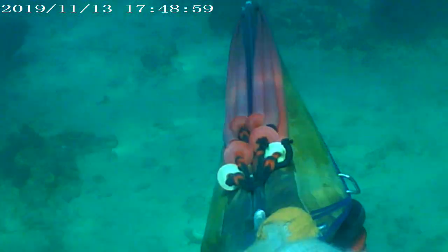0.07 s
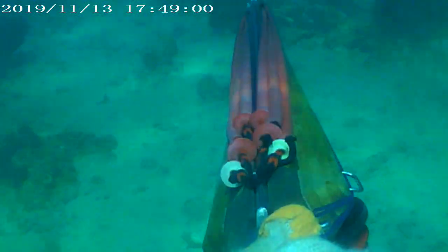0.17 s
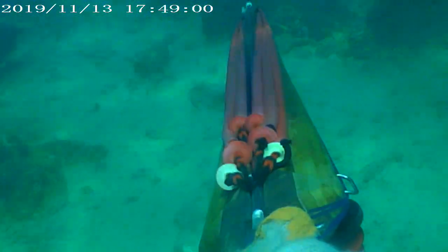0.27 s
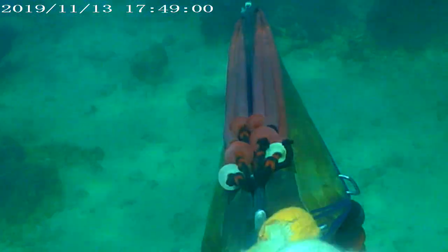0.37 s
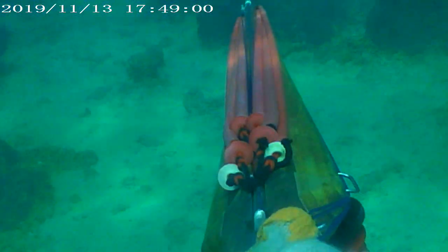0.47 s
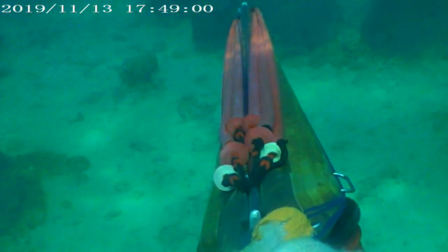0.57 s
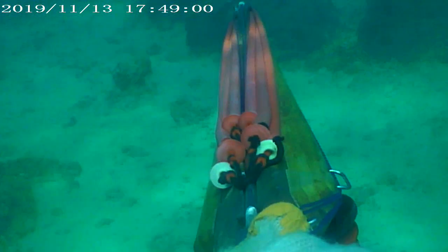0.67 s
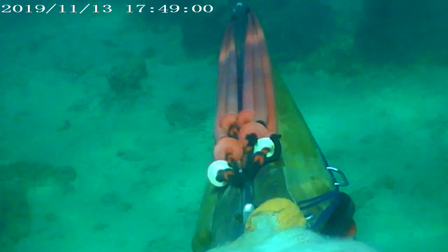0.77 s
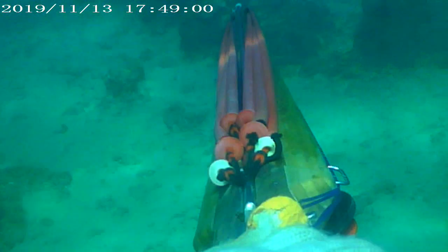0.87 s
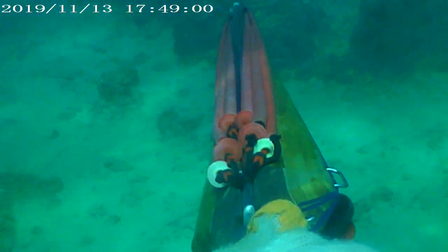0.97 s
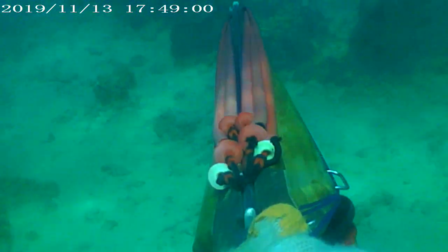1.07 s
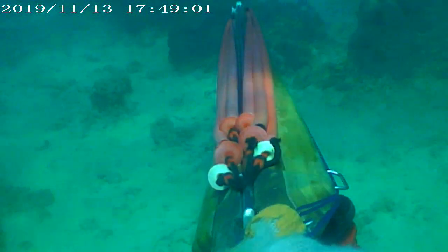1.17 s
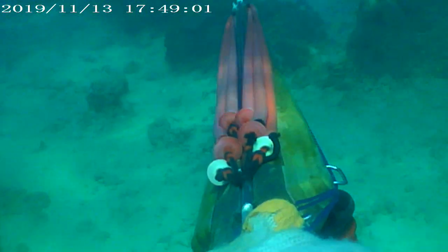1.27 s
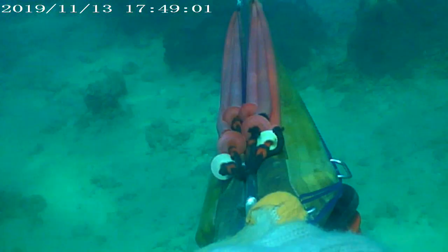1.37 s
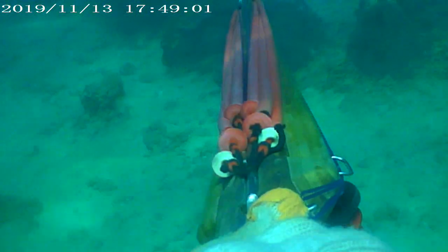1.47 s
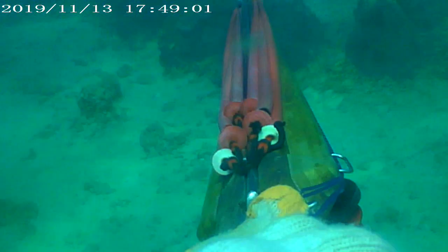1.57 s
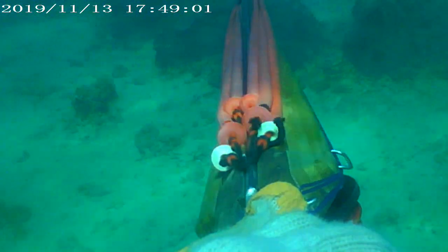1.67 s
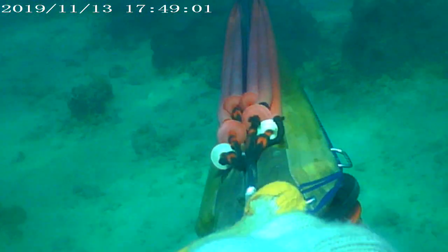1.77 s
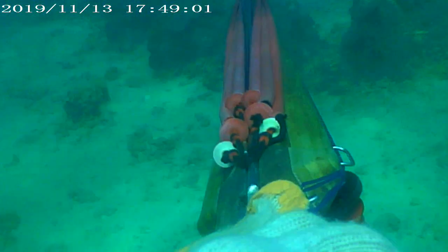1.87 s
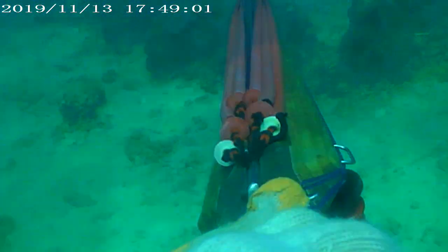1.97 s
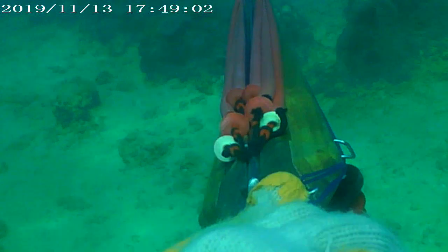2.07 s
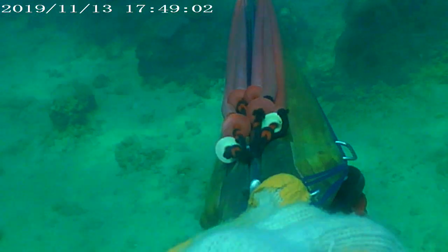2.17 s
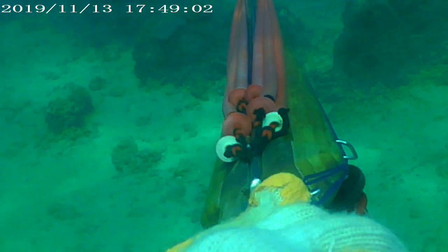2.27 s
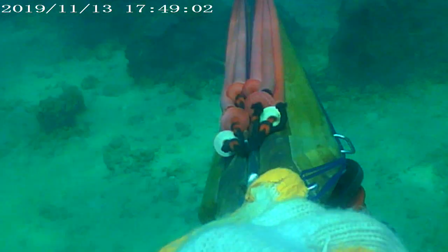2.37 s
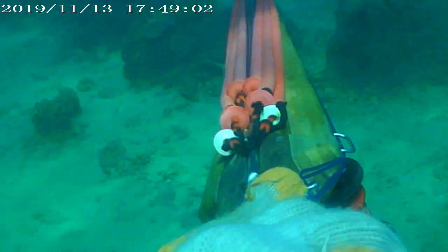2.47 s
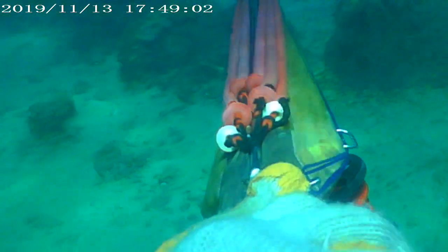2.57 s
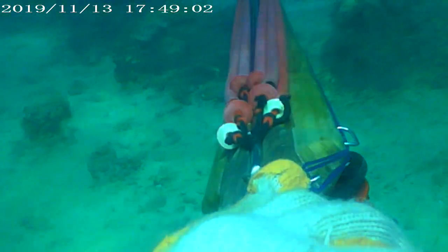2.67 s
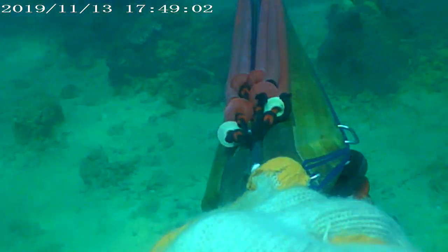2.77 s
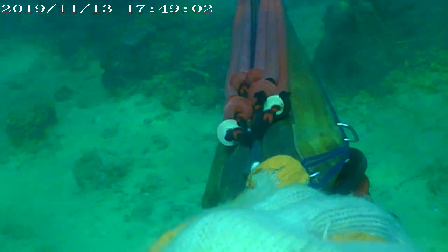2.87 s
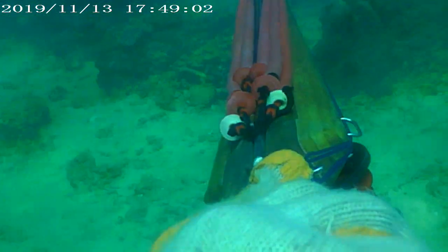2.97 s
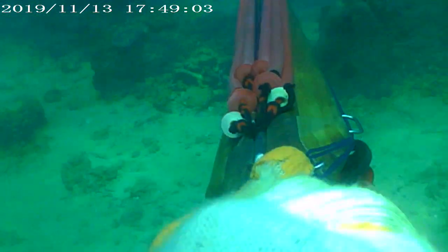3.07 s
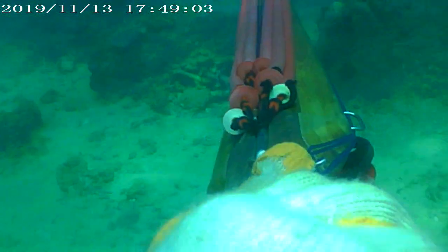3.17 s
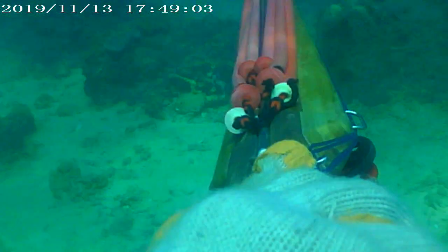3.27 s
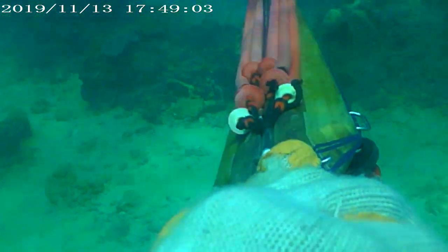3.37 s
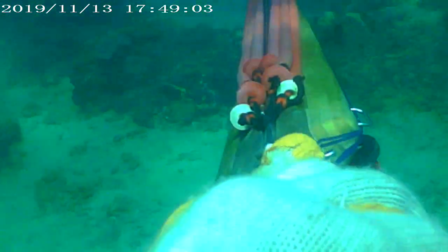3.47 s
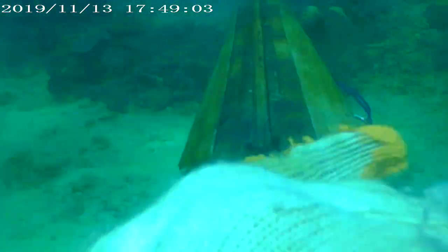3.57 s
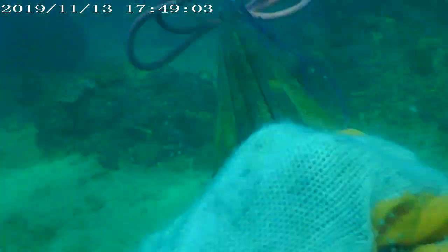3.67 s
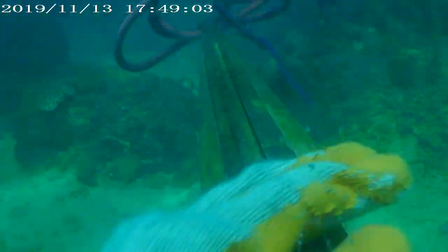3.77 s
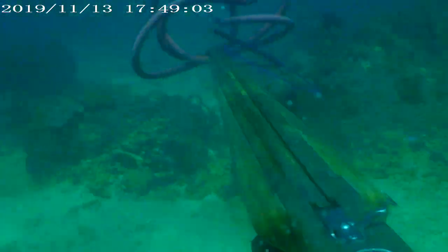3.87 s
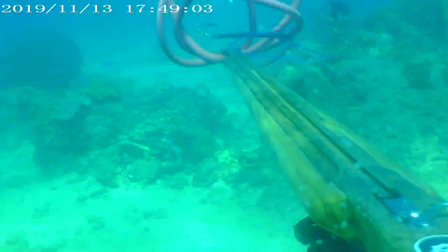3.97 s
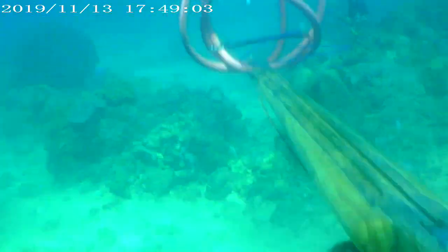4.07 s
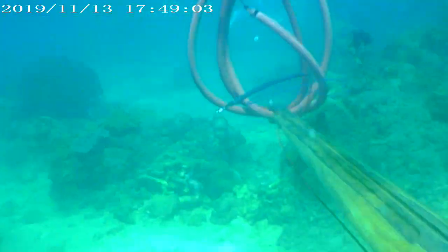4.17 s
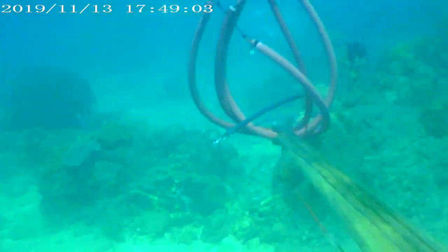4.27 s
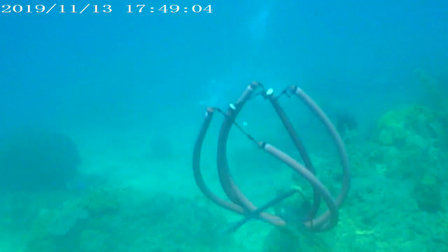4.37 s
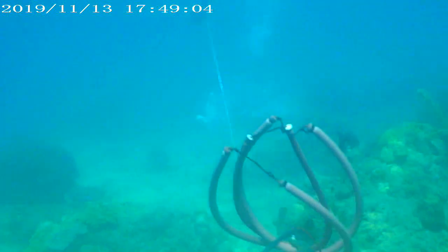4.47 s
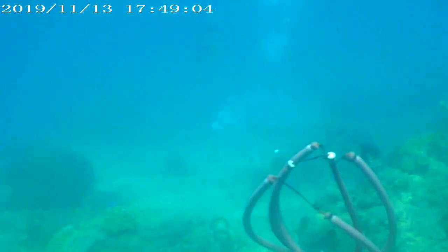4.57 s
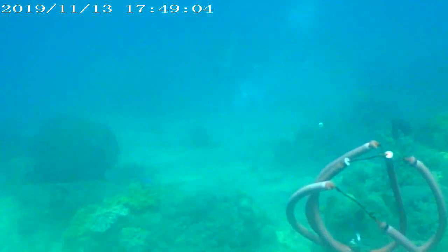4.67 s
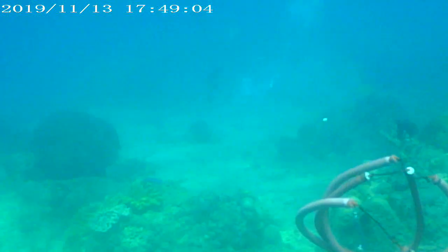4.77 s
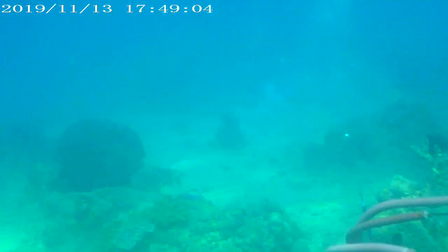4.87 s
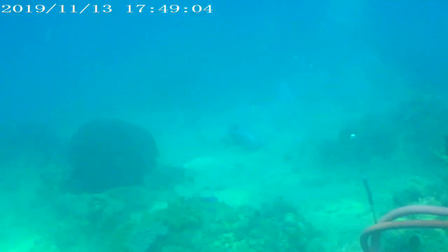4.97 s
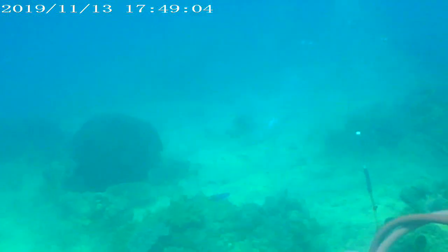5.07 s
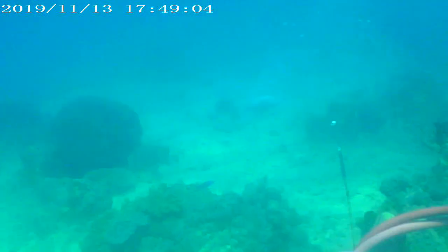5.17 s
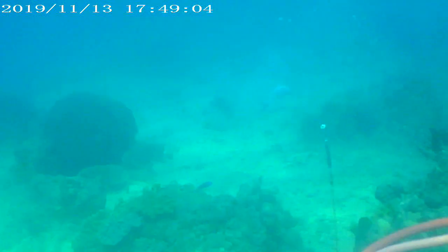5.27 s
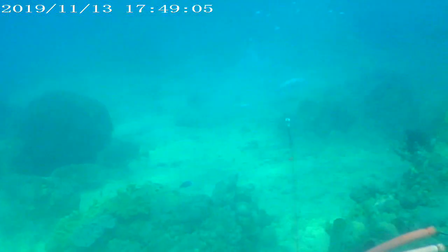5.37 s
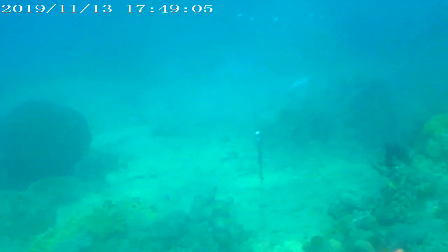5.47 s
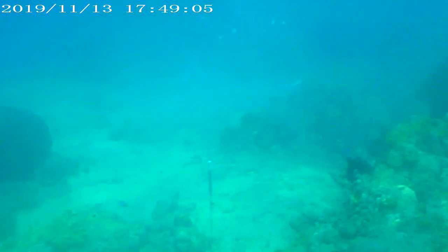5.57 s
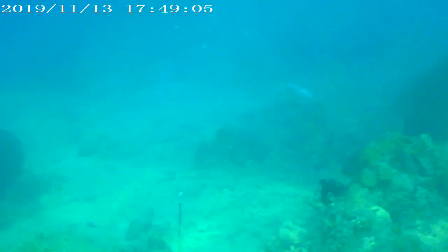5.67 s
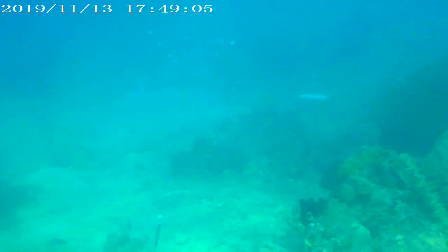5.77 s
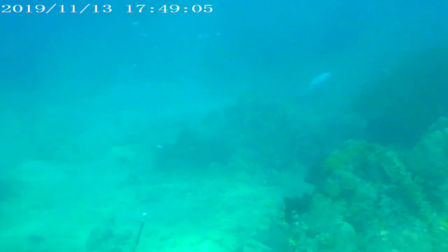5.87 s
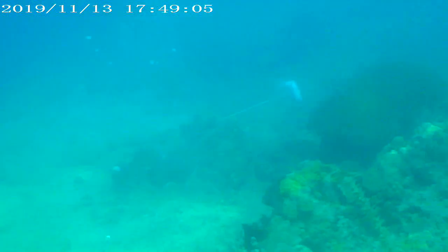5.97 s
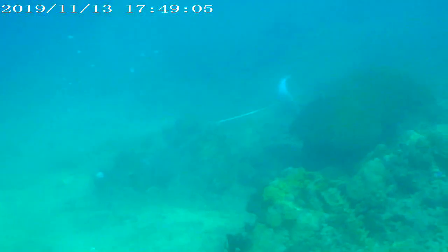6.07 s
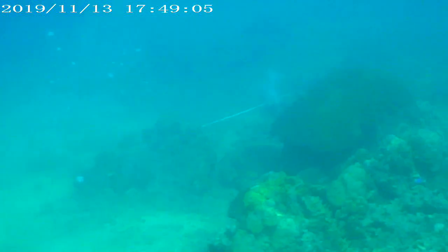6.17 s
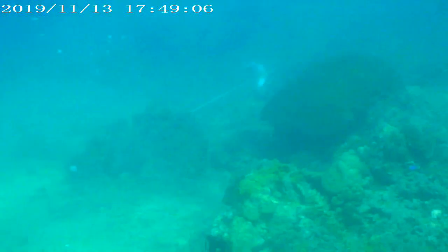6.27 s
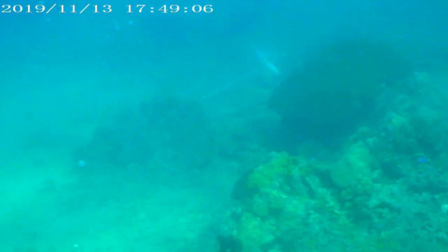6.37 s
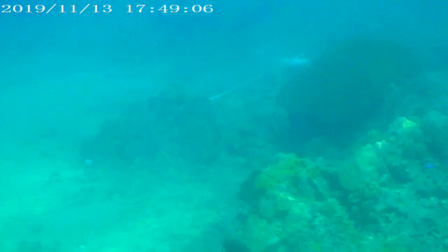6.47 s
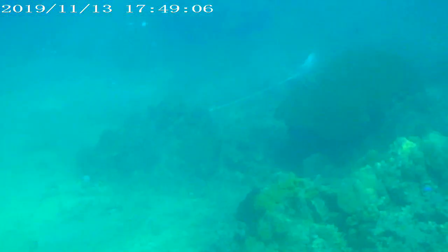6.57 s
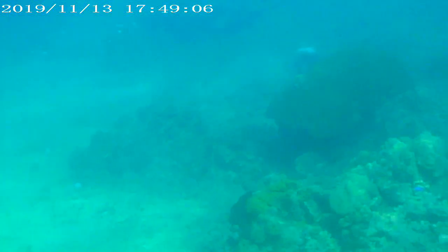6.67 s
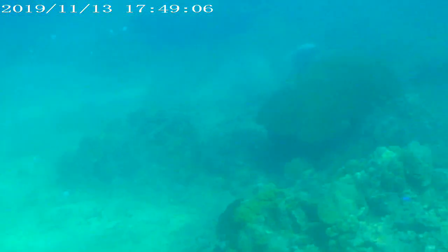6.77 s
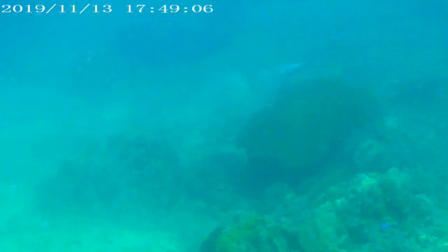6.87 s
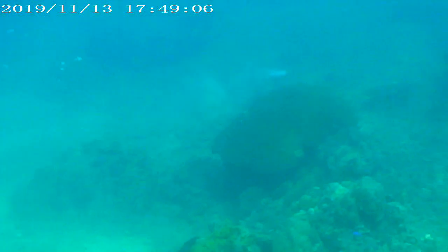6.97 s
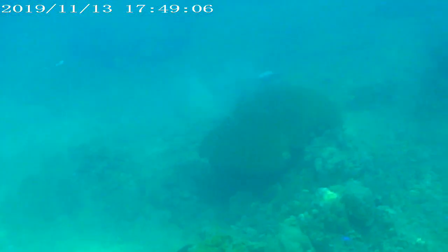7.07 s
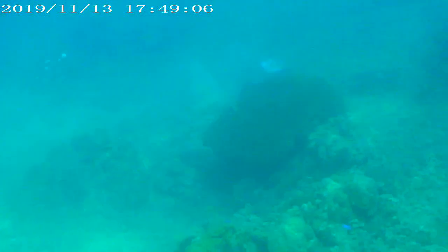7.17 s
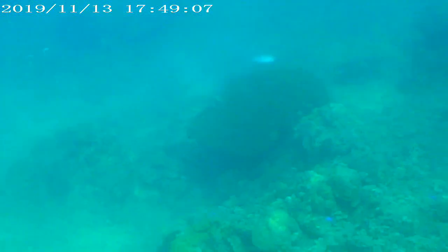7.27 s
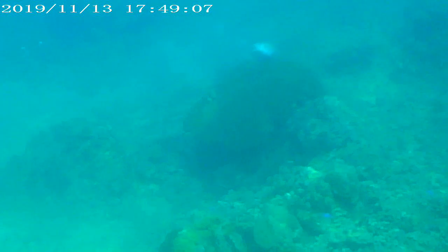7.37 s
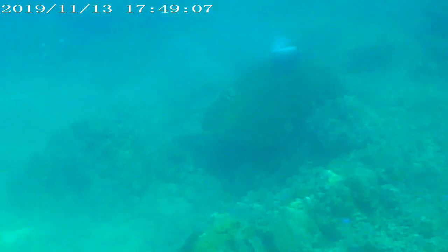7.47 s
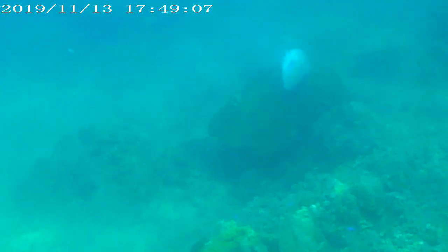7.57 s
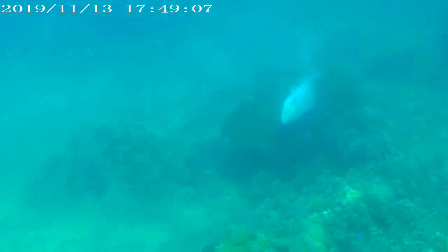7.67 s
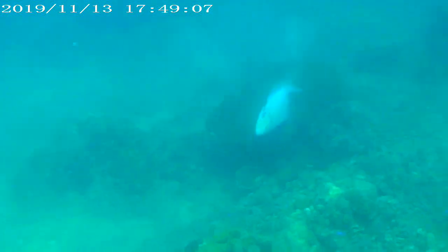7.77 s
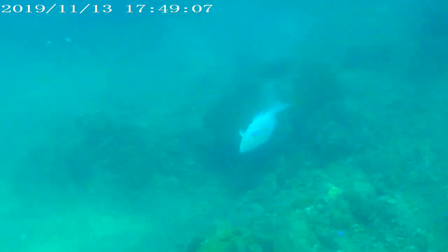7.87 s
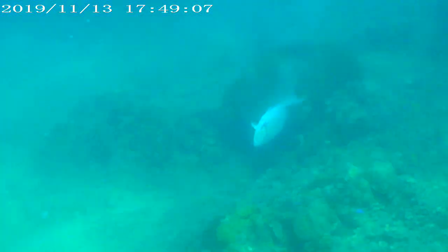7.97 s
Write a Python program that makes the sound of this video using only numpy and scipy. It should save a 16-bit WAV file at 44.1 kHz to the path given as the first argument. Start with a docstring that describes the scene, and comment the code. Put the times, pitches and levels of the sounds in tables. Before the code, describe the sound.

Near-silent underwater hiss with a sharp early knock, then a violent distorted speargun shot and line jerk, followed by rubbing, clicks and bubbly squeaks.

```python
"""Under water, a camera in a plastic housing rides with a rubber-powered speargun, its one microphone inside.
Behind all lies a faint hiss; water, glove and line rub on the housing, and trapped air squeaks out as bubbles.
Knocks and ticks ring the shell and window as decaying modes. Loudest are the shot and the jerk of the line:
swinging tones and rattle that overload the converter, whose values wrap round to the other sign."""
import sys
import numpy as np
from scipy.fft import rfft, irfft, next_fast_len
from scipy.io import wavfile
from scipy.ndimage import map_coordinates

SR = 44100
rng = np.random.default_rng(int(sys.argv[2]) if len(sys.argv) > 2 else 0)


def to_wav(s):
    """Save 16-bit WAV."""
    ch = np.atleast_2d(s).T  # columns
    pcm = np.round(np.clip(ch, -1, 1) * 32767)  # PCM
    wavfile.write(sys.argv[1], SR, pcm.astype(np.int16))


N = 353902  # samples


def amp(db):
    """Gain of a level in dB."""
    return 10 ** (np.asarray(db) / 20)


def unit(x):
    """x at rms 1."""
    return x / np.sqrt(np.mean(x ** 2) + 1e-20)


def curves(rows):
    """One value per sample for each column after the time; -120 outside the table."""
    times, *columns = np.transpose(rows)
    t = np.arange(N) / SR
    return [np.interp(t, times, column, left=-120, right=-120) for column in columns]


def wobble(rate):
    """A smooth random curve, rate knots a second."""
    knots = rng.standard_normal(int(N * rate / SR) + 4)
    return map_coordinates(knots, [np.arange(N) * rate / SR])


def filtered(x, response):
    """x times a complex response of frequency, padded so that tails do not wrap."""
    m = next_fast_len(len(x) + 8192)
    return irfft(rfft(x, m) * response(np.fft.rfftfreq(m, 1 / SR)), m)[:len(x)]


def modes(table, wider=0.86):
    """Causal response of a set of resonances, alternating in sign, every width scaled by wider."""
    def response(f):
        total = 0
        for k, (center, width, db) in enumerate(table):
            damping = 1j * f * width * wider
            total = total + (-1) ** k * amp(db) * damping / (center ** 2 - f ** 2 + damping)
        return total
    return response


def grains(rate, spread_db, bed):
    """Random slips of uneven size, rate a second on average, on a bed of noise."""
    chance, size = rng.random((2, N))
    sizes = amp(-spread_db * np.log(size + .04))
    slips = (chance < rate / SR) * sizes * rng.choice([-1, 1], N)
    return unit(slips) + bed * rng.standard_normal(N)


def ring(table, t60, attack):
    """One blow: every mode at a new strength, swelling for the attack time, peak 1."""
    t = np.arange(SR // 5) / SR
    x = np.zeros(len(t))
    for hz, width, db in table:
        strength = amp(db + rng.normal(0, 2))
        x += strength * np.sin(2 * np.pi * hz * t) * np.exp(-.5 * width * t)
    x = x * amp(-60 * t / t60) * (1 - np.exp(-(t / attack) ** 2))
    return x / np.abs(x).max()


def add(track, s, x):
    """Mix x into track at time s."""
    track[round(s * SR):][:len(x)] += x


# spectrum of the faint background: f/Hz, relative density level/dB per Hz
HISS_SPECTRUM = [(15, -52), (25, -12.5), (64, -6.5), (98, -2), (150, -4), (258, -4.5), (728, -5), (944, -8),
                 (4270, -14.5), (7000, -17), (9100, -43.5), (15400, -120)]
HISS_DB = -58  # rms level, before a slight wobble


def hiss():
    """Microphone noise and far reef crackle: sparse grains on noise, shaped to one spectrum."""
    f, density_db = np.transpose(HISS_SPECTRUM)
    spectrum = lambda hz: amp(np.interp(np.log(hz + 1), np.log(f), density_db))
    x = filtered(grains(210, 2.4, bed=1.77), spectrum)
    return amp(HISS_DB + .6 * wobble(19)) * unit(x)


# Resonances of the housing's shell and of its stiff window: f/Hz, width, level/dB.
# Width is in Hz, before scaling, where noise is filtered; in a blow, half of it is a decay rate per second.
SHELL_MODES = [(183, 26, 1), (329.5, 13, -13.5), (502.7, 123, -1), (594.4, 98, -1.5), (830, 88, -20.5)]
WINDOW_MODES = [(1406, 160, -3.5), (1899.5, 120, -4), (2076, 120, -4), (3007, 110, -3.5), (4230, 310, -9),
                (5230, 200, -16), (5927, 310, -9.5)]
# water streaming along the housing after the shot, levels before the trims in rubbing():
# t/s, rumble level/dB, shell level/dB, window level/dB
WATER_STREAM = [(3.76, -39, -38, -48), (3.88, -53.5, -41, -48.5), (4.15, -59.5, -46, -52),
                (4.57, -63.5, -49.5, -56.5), (4.78, -63.5, -52.5, -55.5), (5.1, -68, -59, -57.5),
                (5.4, -66, -56, -54), (5.53, -51.5, -43.5, -55), (5.76, -63, -56.5, -57.5),
                (6.02, -74, -63, -62), (6.31, -62, -57.5, -58.5), (6.43, -58.5, -64, -64),
                (6.56, -51.5, -47.5, -61), (6.76, -70.5, -69, -68), (6.92, -63.5, -54, -56.5),
                (7.2, -65.5, -58.5, -63), (7.5, -64, -54.5, -61.5), (7.76, -62.5, -49, -55.5),
                (7.9, -61, -55.5, -65), (8.02, -62, -72, -62)]
STREAM_FIZZ_DB = -10  # upper window over the lower, before the trims
# line and glove scraping over the window, levels before the trims:
# start t/s, length t/s, level/dB, upper window level/dB over it
WINDOW_SCRAPES = [(0.395, .045, -54, 5), (3.745, .04, -36, -12), (4.628, 0.15, -40, -6),
                  (4.919, 0.12, -45, -2), (5.148, 0.043, -39, -7.5), (5.332, 0.082, -49, 4),
                  (5.432, 0.032, -52, 17.5), (5.513, 0.071, -40.5, -6), (5.639, 0.12, -48.5, -7.5),
                  (6.458, 0.048, -38.5, -1.5), (6.535, 0.1, -53, 0.5), (6.655, .04, -48, -7),
                  (7.08, 0.11, -58, -1), (7.324, 0.099, -52, -3), (7.497, 0.082, -51.5, 2.5),
                  (7.615, 0.24, -53.5, -1)]


def rubbing():
    """Slips of glove, line and water excite each part of the housing; each scrape swells and fades."""
    rumble_db, shell_db, window_db = curves(WATER_STREAM)
    window_gain = amp(window_db)
    fizz_gain = amp(window_db + STREAM_FIZZ_DB)
    for s, length, db, upper_db in WINDOW_SCRAPES:
        swell = np.sin(np.pi * np.linspace(0, 1, round(length * SR)) ** 0.87)
        add(window_gain, s, amp(db) * swell)
        add(fizz_gain, s, amp(db + upper_db) * swell)
    rumble_modes = [(40, 50, -4), (125, 50, 0), SHELL_MODES[0], (290, 90, -5)]
    rumble = unit(filtered(grains(48, 3.1, bed=0.72), modes(rumble_modes)))
    shell = unit(filtered(grains(110, 2.5, bed=0.55), modes(SHELL_MODES[1:])))
    scrape = grains(260, 4.5, bed=.55) * amp(3 * wobble(35))
    window = unit(filtered(scrape, modes(WINDOW_MODES[:3])))
    fizz = unit(filtered(scrape, modes(WINDOW_MODES[3:])))
    body = amp(rumble_db + 4 + 2.0 * wobble(8)) * rumble + amp(shell_db - 1 + 5.2 * wobble(24)) * shell
    return body + amp(-4.0) * window_gain * window + amp(-7.5) * fizz_gain * fizz


# trapped air squeaking out: t/s, length t/s, first f/Hz, last f/Hz, peak level/dB before the wavering
AIR_BUBBLES = [(4.253, 0.055, 522, 565, -36.5), (5.16, 0.024, 1950, 2200, -33.5),
               (5.318, .045, 1985, 1940, -46), (5.379, 0.027, 710, 680, -44),
               (6.543, 0.026, 1890, 1900, -43.5), (7.085, .03, 1880, 1950, -51.5)]


def bubbles():
    """Each one is a wavering tone that glides, swells and fades."""
    out = np.zeros(N)
    for s, length, first_hz, last_hz, db in AIR_BUBBLES:
        u = np.arange(round(length * SR)) / (length * SR)
        swell = np.sin(np.pi * u ** 1.06)
        glide_hz = first_hz + (last_hz - first_hz) * u
        add(out, s, amp(db) * swell * np.sin(2 * np.pi * np.cumsum(glide_hz) / SR))
    return out * amp(3.95 * wobble(200))


# hard contacts: t/s, strength as level/dB before the ring and crack trims, emphasised f/Hz
HARD_TICKS = [(0.2956, -31, 4200), (0.3338, 2.2, 3688), (0.41, -40, 3920), (0.434, -39.5, 1370),
              (0.897, -38, 2020), (1.1045, -38, 1880), (1.2497, -39, 2000), (2.23, -36, 1920),
              (2.6995, -42, 2070), (3.1421, -27, 1790), (3.3656, -36.5, 2020), (3.8423, -39, 1970),
              (4.1694, -43, 2050), (4.4466, -33.5, 4220), (4.643, -28, 1800), (4.675, -27.5, 1480),
              (4.7152, -23.5, 1446), (4.7917, -38.5, 1870), (4.83, -40, 1390), (4.9626, -29.5, 2060),
              (5.018, -40, 1370), (5.2784, -37.5, 1480), (5.356, -31.5, 1920), (5.443, -24.5, 3070),
              (5.5131, -23, 2000), (5.5697, -34.5, 1800), (5.658, -32.5, 1520), (5.716, -43, 2000),
              (5.804, -32.5, 1300), (6.1254, -31, 1890), (6.215, -40, 2000), (6.4647, -16.5, 1460),
              (6.4842, -26, 1690), (6.5994, -35.5, 1980), (6.6838, -41, 1990), (6.986, -42, 4230),
              (7.0444, -32, 2120), (7.1435, -30, 1920), (7.5374, -36, 1390), (7.585, -34.5, 2000),
              (7.7528, -38, 1410), (7.79, -44, 1400), (7.9108, -32.5, 4230), (7.998, -38, 4200)]
TICK_ATTACK_S = .001
TICK_T60_S, TICK_DAMPING = 0.023, 0.086  # t60 at strength 0 dB; it grows this many dB per dB of weakness


def ticks():
    """A hard contact rings the stiff window, most of all near one pitch, with a short crack; hard ones die faster."""
    out = np.zeros(N + SR)
    crack_fade = amp(-60 * np.arange(400) / SR / 0.017)
    for s, db, hz in HARD_TICKS:
        crack = rng.standard_normal(400) * crack_fade
        t60 = TICK_T60_S * amp(-TICK_DAMPING * db)
        add(out, s, amp(db - 5.5) * ring(WINDOW_MODES + [(hz, 400, 0)], t60, TICK_ATTACK_S))
        add(out, s + TICK_ATTACK_S, amp(db - 10) * np.diff(crack))  # differencing brightens the crack
    return out[:N]


# soft contacts, levels before the low cut: t/s, ring peak level/dB, thump level/dB over the ring,
# thump f/Hz, strongest ring f/Hz, ring t60 t/s (on top of each mode's own decay)
SOFT_KNOCKS = [(0.243, -48, 10.5, 129, 323, .07), (0.3345, -5, -27.5, 199, 573, 0.0454),
               (0.656, -47.5, -10, 204, 514, 0.1), (0.987, -32, 10, 161, 400, 0.046),
               (1.45, -33, -5.5, 200, 587, 0.024), (3.759, -22.5, 1.5, 177, 585, 0.054),
               (3.781, -21.5, -12, 184, 564, 0.087), (3.799, -26.5, 4.5, 126, 550, 0.054),
               (3.839, -31, -1.5, 237, 540, 0.046), (3.868, -30, 3, 164, 514, 0.047),
               (3.904, -28.5, -3.5, 185, 462, .12), (3.957, -38, 2, 183, 436, 0.25),
               (4.02, -33.5, 6, 183, 547, 0.29), (4.06, -35, -14, 320, 445, 0.071),
               (4.103, -29.5, -11, 200, 470, 0.068), (4.168, -34, -3, 250, 473, 0.15),
               (4.316, -41.5, 9, 196, 428, 0.15), (4.482, -33.5, -26, 150, 548, .075),
               (4.499, -42, -6, 130, 566, .081), (4.542, -42, -25, 186, 573, 0.11),
               (4.829, -25.5, -10, 199, 575, 0.022), (4.906, -32, -3, 132, 476, 0.031),
               (5.236, -60, 17.5, 164, 413, .064), (5.477, -30, -1.5, 136, 444, 0.04),
               (5.512, -35, 2.5, 186, 600, 0.032), (5.567, -37.5, -24.5, 186, 537, 0.082),
               (5.641, -18.5, 2, 192.4, 313, 0.04), (5.914, -42, -9, 147, 546, 0.03),
               (5.94, -34, 7.5, 134, 470, 0.085), (6.004, -41, 5.5, 173, 447, .033),
               (6.336, -44, 0, 197, 515, 0.13), (6.462, -11.5, 1, 215, 367, 0.044),
               (6.485, -20.5, -3, 199, 575, 0.086), (6.551, -29.5, -10, 127, 499, 0.17),
               (6.681, -37.5, -28, 124, 553, 0.11), (7.142, -43.5, -1.5, 253, 525, 0.24),
               (7.395, -46.5, 15, 181, 456, .11), (7.41, -31, 3.5, 175.4, 432, 0.042),
               (7.535, -26, -19, 190, 553, 0.024), (7.632, -42.5, 2, 122, 653, 0.17),
               (7.659, -42.5, -17, 234, 680, 0.086), (7.69, -36.5, -22, 297, 655, 0.18),
               (7.745, -28, 0.5, 125, 642, 0.03), (7.786, -30, -1.5, 137, 602, 0.053),
               (7.857, -38, -22, 103, 554, 0.072), (7.928, -55.5, 22.5, 104, 484, 0.049)]
KNOCK_ATTACK_S, KNOCK_SOFTENING = .0013, .12  # attack at 0 dB; it grows this many dB per dB of weakness


def knocks():
    """A soft contact pushes the whole camera (thump) and rings the shell."""
    out = np.zeros(N + SR)
    for s, db, thump_db, thump_hz, ring_hz, t60 in SOFT_KNOCKS:
        attack = KNOCK_ATTACK_S * amp(-KNOCK_SOFTENING * db)
        shell = SHELL_MODES[1:] + [(ring_hz, 20, 4), (1100, 500, -10)]
        body = [(thump_hz, 10, 0), (1.467 * thump_hz, 60, -6), (2.31 * thump_hz, 300, -2)]
        add(out, s + .001, amp(db) * ring(shell, t60, attack))
        add(out, s + .001, amp(db + thump_db) * ring(body, 0.072, attack))
    # low cut: keeps each knock's sudden onset from adding a slow offset
    return filtered(out[:N], lambda f: (1j * f / (90 + 1j * f)) ** 2)


# Jolts as the trigger slips, the spear runs out and the gun kicks back; then as the line pulls tight.
# Both: t/s, hold t/s, t60 t/s, ring level/dB before flutter, surge level/dB, rattle level/dB
RELEASE_JOLTS = [(3.5822, .0048, .001, 0, 8, -9), (3.5917, .003, .01, -8, -9, -22),
                 (3.595, .003, .004, 0, 2, -16), (3.5985, .005, .004, 8, 13, -20),
                 (3.6045, .019, .003, 14, 4, -24), (3.6255, .0075, .014, -10, -21, -27),
                 (3.637, .009, .08, -13, -20, -29), (3.662, .01, .12, -32, -30, -38)]
LINE_JOLTS = [(3.7315, .003, .01, -9, -12, -42), (3.7358, .0026, .012, -5, -3, -32),
              (3.741, .002, .07, -13, -13, -36)]
JOLT_ATTACK_S, FLUTTER_DB = .0012, 1.5


def blow(jolts, ring_hz, surge_hz):
    """A violent shock: the shell swings at its main pitch on a slower surge, with a rattle on top.
    Each jolt rises, holds and dies away."""
    gains = np.zeros((3, N + SR))
    t = np.arange(SR // 4) / SR
    for s, hold, t60, *db in jolts:
        rise = np.minimum(t / JOLT_ATTACK_S, 1)
        decay = amp(-60 * np.maximum(t - JOLT_ATTACK_S - hold, 0) / t60)
        for gain, level in zip(gains, amp(db)):
            add(gain, s, level * rise * decay)

    def swing(hz, drift):
        """A sine of wandering pitch and random starting phase."""
        cycles = np.cumsum(hz * (1 + drift * wobble(120))) / SR
        return np.sin(2 * np.pi * (rng.random() + cycles))

    rattle_modes = modes(WINDOW_MODES[:4] + [(4300, 200, -2)] + WINDOW_MODES[5:], wider=1.5)
    rattle = unit(filtered(rng.standard_normal(N), lambda f: rattle_modes(f) / (1 + (f / 5000) ** 4)))
    ringing = amp(FLUTTER_DB * wobble(220)) * swing(ring_hz, .06)
    surge = swing(surge_hz, .3)
    return (gains[:, :N] * [ringing, surge, rattle]).sum(axis=0)


def scene():
    """All sources reach one microphone inside the housing."""
    shot = blow(RELEASE_JOLTS, ring_hz=545.3, surge_hz=90.05)
    line = blow(LINE_JOLTS, ring_hz=530, surge_hz=300.7)
    return (hiss() + rubbing() + bubbles() + ticks() + knocks() + shot + line)[None]


FULL_SCALE, CEILING = .66, .7  # sample values where the converter wraps and where its ripple is clipped
ROLL_HZ, EDGE_HZ, TOP_HZ = 6680, 8016, 16000  # steep roll-off, end of the band, limit after clipping


def record(dry):
    """The preamp saturates near twice full scale, values past full scale wrap round to the other sign,
    the band ends, and the ripple of the jumps is clipped at a ceiling."""
    boosted = amp(2.5) * dry[0]
    saturated = boosted / (1 + np.abs(boosted / (2.1 * FULL_SCALE)) ** 4) ** (1 / 4)
    # slow swings pass whole, fast ones at .72: a sudden step creeps the last of its way
    settled = filtered(saturated, lambda f: .72 + .28 / (1 + 1j * f / 250))
    wrapped = (settled + FULL_SCALE) % (2 * FULL_SCALE) - FULL_SCALE
    soft = filtered(wrapped, lambda hz: (hz < EDGE_HZ) / np.sqrt(1 + (hz / ROLL_HZ) ** 44))
    clipped = np.clip(soft, -CEILING, CEILING)
    return filtered(clipped, lambda hz: hz < TOP_HZ)[None]


dry = scene()
out = record(dry)
to_wav(out)
```